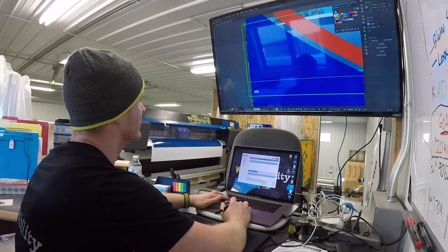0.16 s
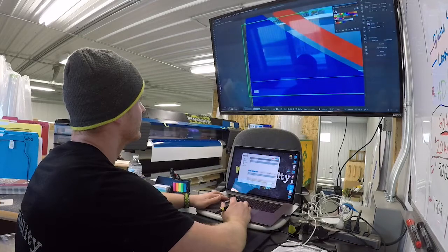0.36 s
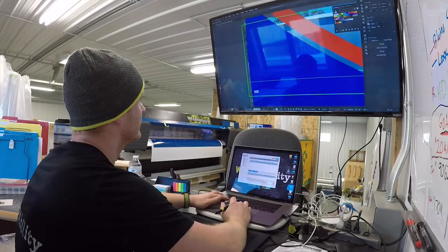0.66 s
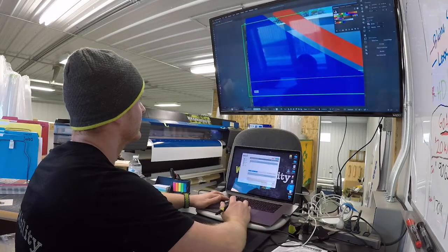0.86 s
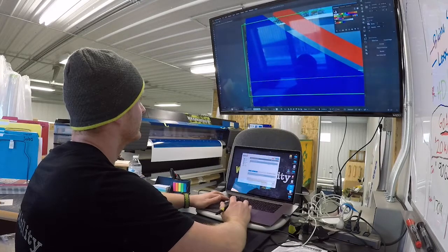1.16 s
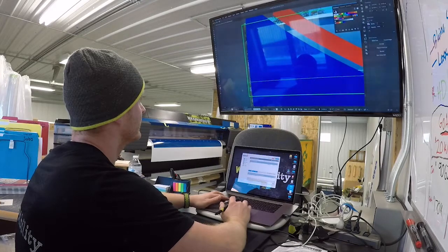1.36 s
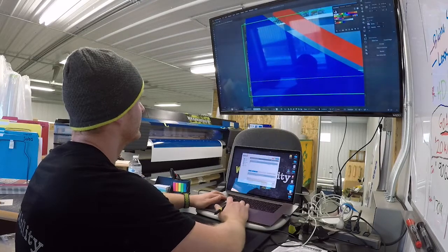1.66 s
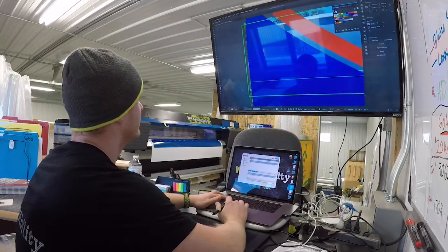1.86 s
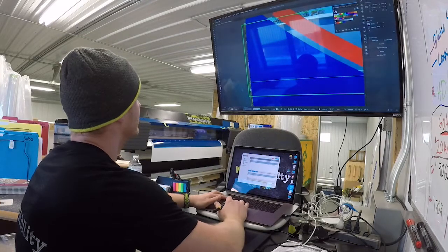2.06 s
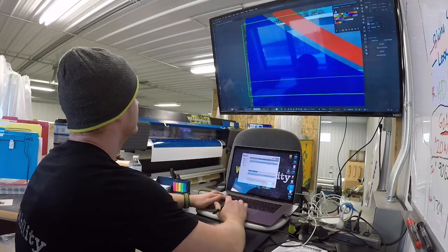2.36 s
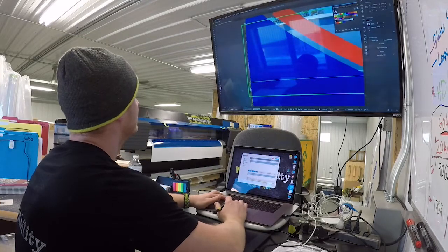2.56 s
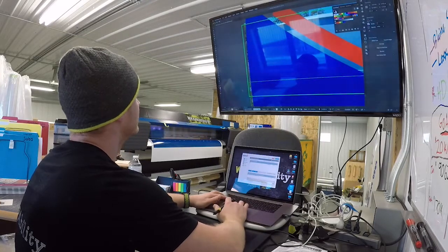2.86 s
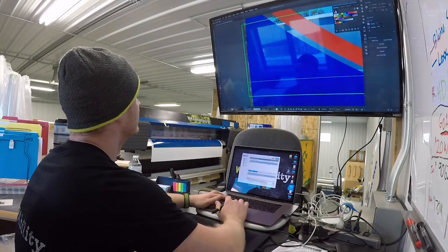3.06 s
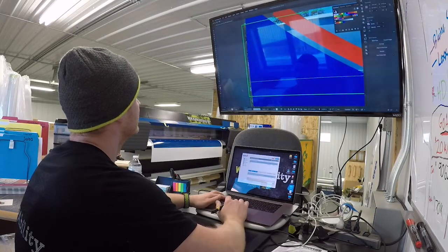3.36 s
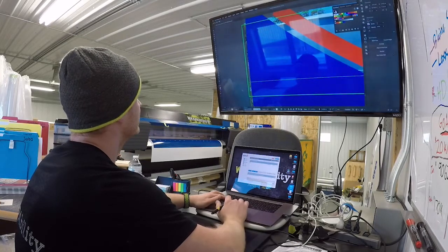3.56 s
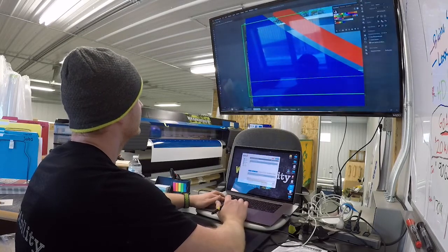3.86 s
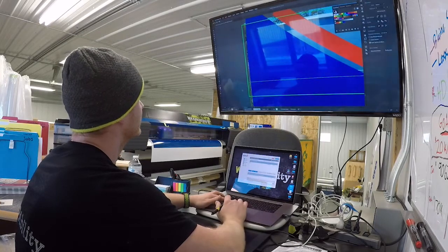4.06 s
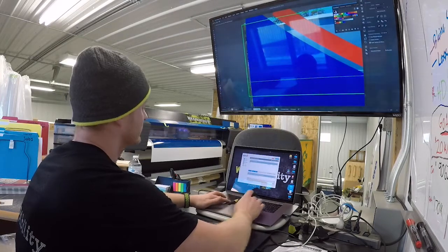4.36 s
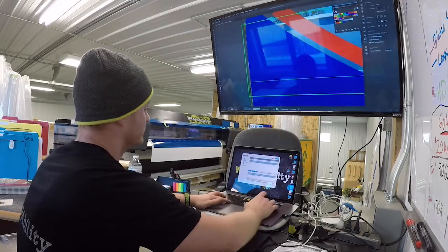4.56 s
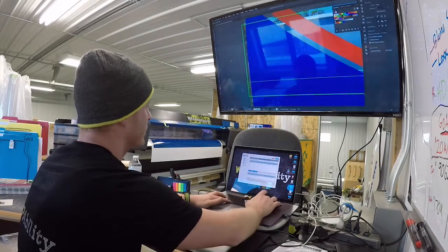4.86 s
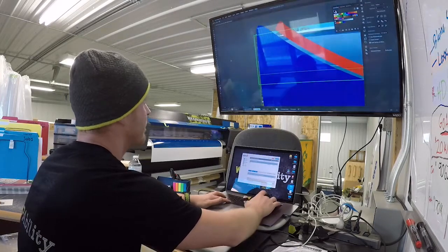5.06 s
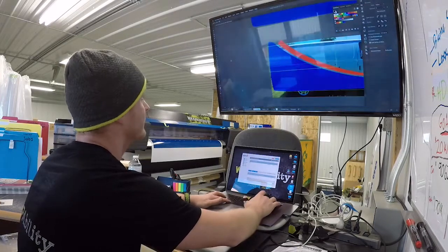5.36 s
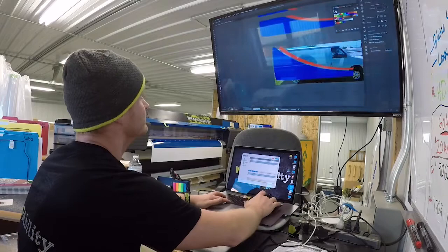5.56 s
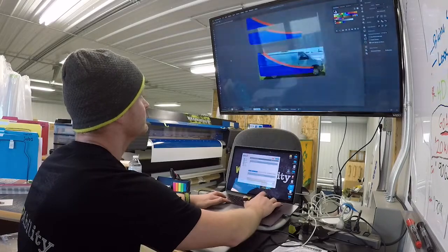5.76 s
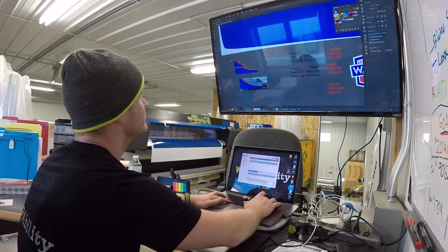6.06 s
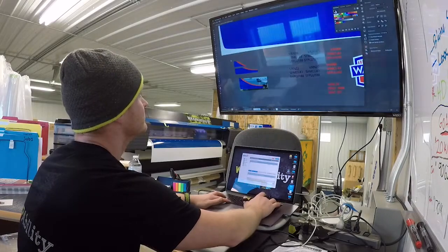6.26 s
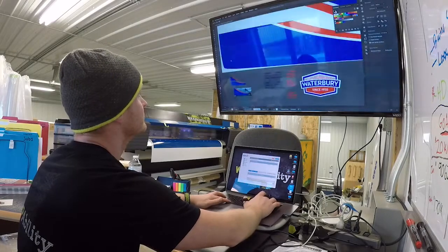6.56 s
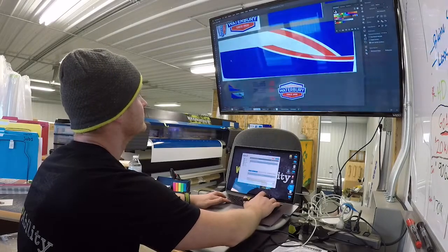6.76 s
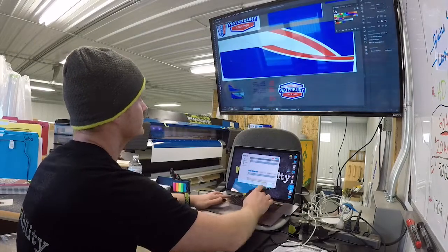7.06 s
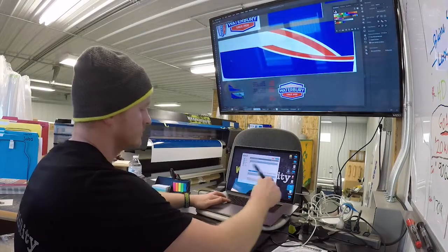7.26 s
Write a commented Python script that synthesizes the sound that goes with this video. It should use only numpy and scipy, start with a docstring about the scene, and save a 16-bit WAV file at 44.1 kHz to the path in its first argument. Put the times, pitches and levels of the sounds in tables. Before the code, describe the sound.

Indoors, a large inkjet printer's head whines along its rail, brakes, rests and returns, above a constant throbbing vacuum-fan drone.

```python
"""The carriage of a wide-format inkjet printer sweeps along its rail, brakes, rests and sets off back.
Its drive gear whines with its speed, made of gliding tones and noise; belt and motor add tones.
Sliding parts hiss and rumble as filtered noise, and the workshop adds a tail of echoes.
Behind it, vacuum fans hum with wavering tones and blow with shaped noise without pause.
A few small ticks, short bursts of noise, sound nearby."""
import sys
import numpy as np
from scipy import signal
from scipy.fft import next_fast_len
from scipy.io import wavfile

SR = 44100
rng = np.random.default_rng(int(sys.argv[2]) if len(sys.argv) > 2 else 0)


def waveform_to_disk(signal):
    """Save audio, clipped to [-1, 1], as 16-bit WAV at the path in sys.argv[1]."""
    frames = np.transpose(np.atleast_2d(signal))
    scaled = np.clip(frames, -1, 1) * 32767
    samples = np.round(scaled).astype(np.int16)
    wavfile.write(sys.argv[1], SR, samples)


N = 327247
TIME = np.arange(N) / SR
SIDES = np.array([[1], [-1]])  # left, right


def undb(db):
    """Turn decibels into a gain: every 20 dB is a factor of ten."""
    return 10 ** (np.asarray(db) / 20)


def read(points, hz):
    """Join (frequency, value) points by straight lines on a log-frequency axis."""
    at, value = np.transpose(points)
    return np.interp(np.log(hz + 1), np.log(at), value)


def walk(rate):
    """Wander smoothly between random values of spread 1, drawn rate times a second."""
    knots = rng.standard_normal(1024)
    coarse = TIME[::64]
    k = (coarse * rate).astype(int)
    blend = np.sin((coarse * rate - k) * np.pi / 2) ** 2
    here, following = knots[k % len(knots)], knots[(k + 1) % len(knots)]
    return np.interp(TIME, coarse, here * (1 - blend) + following * blend)


# how alike diffuse sound is on the left and right: (frequency [Hz], likeness [-1 to 1])
LIKENESS = [(60, 0.5), (150, 0.9), (290, 0.8), (630, 0.37), (1200, 0), (2000, 0.16), (4000, 0.97),
            (6500, 0.18), (8500, -.2), (12500, 0.05)]
# the printer's bass comes from the left: (frequency [Hz], left minus right [dB])
BALANCE = [(60, 11), (180, 3.5), (370, 3), (680, 0), (1260, -0.5), (2300, -0.5), (4200, 1.5), (8000, 0.5)]


def noise(spectrum):
    """Complex stereo noise; its real part has the spectrum given as (frequency [Hz], level [dB per Hz])."""
    size = next_fast_len(N)
    hz = np.arange(size // 2) * SR / size
    mid, side = rng.standard_normal((2, len(hz))) + 1j * rng.standard_normal((2, len(hz)))
    like = np.clip(read(LIKENESS, hz), -1, 1)
    # the shared part makes the two sides alike, the opposed part makes them differ
    ears = mid * np.sqrt((1 + like) / 2) + SIDES * side * np.sqrt((1 - like) / 2)
    gain = undb(read(spectrum, hz) + SIDES * read(BALANCE, hz) / 2)
    return np.fft.ifft(ears * gain, size)[:, :N] * np.sqrt(size * SR)


# as the carriage crosses the room's standing waves, its tones shift between left and right
SWAY_RAD, SWAY_DB, SWAY_RATE = .75, 2.5, 3  # spread [rad], spread [dB], shifts a second


def tones(table, clock, flutter_db, flutter_rate, drift_rad, moving=False):
    """Fluttering, drifting tones of turning parts; clock counts seconds of full-speed running."""
    out = np.zeros((2, N))
    for hz, db, pan_db, lead in table:
        phase = 2 * np.pi * (hz * clock + rng.random()) + drift_rad * walk(2.5)
        size = np.sqrt(2) * undb(db + flutter_db * walk(flutter_rate))
        left, right = undb(pan_db / 2), undb(-pan_db / 2)
        if moving:
            sway = undb(SWAY_DB / 2 * walk(SWAY_RATE))
            left, right = left * sway, right / sway
            lead = lead + SWAY_RAD * walk(SWAY_RATE)
        out[0] += size * left * np.sin(phase + lead / 2)
        out[1] += size * right * np.sin(phase - lead / 2)
    return out


def room(x, wet_db, t60):
    """The workshop's many echoes form a tail, different left and right, that falls 60 dB in t60 seconds."""
    t = TIME[:SR]
    tail = rng.standard_normal((2, SR)) * np.exp(-np.log(1000) * t / t60) * (t > .006)
    tail /= np.sqrt(np.sum(tail ** 2, axis=1, keepdims=True))
    wet = undb(wet_db) * signal.fftconvolve(x, tail, axes=1)[:, :N]
    return (x + wet) / np.hypot(1, undb(wet_db))


def linger(level, t60):
    """The room's standing waves build a tone's level up gradually and let it die gradually."""
    keep = np.exp(-np.log(1000) / (t60 * SR))
    return signal.lfilter([1 - keep], [1, -keep], level)


CYCLE_S = 4.195  # once out and back
# outward, then return stroke: (full speed first reached [s], length of run-up [s], time at full speed [s])
STROKES = [(-0.485, .22, 1.587), (1.66, .3, 1.548)]


def sweeps():
    """List every pass: (stroke, full speed reached [s], length of run-up [s], time at full speed [s])."""
    passes = []
    for stroke, (first, run_up, length) in enumerate(STROKES):
        for cruise in np.arange(first, TIME[-1], CYCLE_S):
            passes.append((stroke, cruise, run_up, length))
    return passes


def along_rail(curves):
    """Level in dB along each sweep, from one outward and one return curve timed from reaching full speed."""
    points = sorted((cruise + after, db) for stroke, cruise, _, _ in sweeps() for after, db in curves[stroke])
    return np.interp(TIME, *np.transpose(points))


def by_direction(table):
    """Choose each tone's level by which way the carriage is pulled."""
    first, run_up, _ = STROKES[0]
    outward = (TIME - first + run_up) % CYCLE_S < CYCLE_S / 2
    return [(hz, np.where(outward, out_db, back_db), pan_db, lead)
            for hz, out_db, back_db, pan_db, lead in table]


# blade tones: (frequency [Hz], level before a small raise [dB], left minus right [dB], left lead [rad])
FAN_TONES = [(668.3, -46.1, 10, -.1), (1003.6, -58, -5, -2.5), (1061, -63, -5, 1.4),
             (1124.3, -52, -1, -1.2), (1179, -59.2, 2, -1.1), (2006, -69, 0, -.5)]
# a second, slightly faster fan: (frequency [Hz], relative level [dB], left minus right [dB], left lead [rad])
LOOSE_FAN = [(679.3, -50.5, -2, -.8), (764, -64.5, 0, -.4)]
# the passing carriage shades the second fan; outward, then return:
# (time after reaching full speed [s], level change [dB])
LOOSE_FAN_DB = [
    [(0, 2), (.5, -11), (.9, .5), (1.25, -.5), (1.55, 5)],
    [(-.1, .5), (.45, .5), (.95, -12), (1.2, 1.5), (1.55, 4)],
]
# shaft tones throbbing in the bass: (frequency [Hz], level [dB], left minus right [dB], left lead [rad])
DRONE = [(167.3, -51, 5, -.4), (171, -47.3, 5, -.4), (336, -58, 6, -.5)]
# air rushing through the fans and the platen: (frequency [Hz], level before a small raise [dB per Hz])
FAN_AIR = [(30, -97), (105, -98), (140, -72.5), (170, -62.5), (200, -66.5), (280, -68.5), (380, -72.5),
           (540, -72.5), (570, -80), (600, -68.5), (630, -74), (780, -79.5), (1150, -81.5), (1350, -83.5),
           (1600, -84), (2400, -85.5), (2700, -89), (2980, -94), (3350, -87.5), (4300, -97), (6200, -86.5),
           (8200, -100), (10000, -102), (11300, -112), (12300, -110), (14000, -116)]


def fans():
    """Spinning blades give close tones that beat, over a throbbing shaft drone and rushing air."""
    hum = undb(1.0) * tones(FAN_TONES, TIME, flutter_db=1.0, flutter_rate=5, drift_rad=.6)
    second = tones(LOOSE_FAN, TIME, flutter_db=.8, flutter_rate=3, drift_rad=.6)
    second = undb(along_rail(LOOSE_FAN_DB)) * second
    drone = tones(DRONE, TIME, flutter_db=3.8, flutter_rate=11, drift_rad=1.5)
    air = noise(FAN_AIR).real * undb(0.17 * walk(7.8) + 2.5)
    return hum + second + drone + air


# small ticks: (time [s], level before halving and filtering [dB])
TICKS = [(4.3622, -22), (5.4505, -34), (5.6197, -38)]


def ticks(decay_s, low_hz):
    """Light, dry plastic ticks: bright bursts of noise that die within milliseconds."""
    out = np.zeros((2, N))
    t = TIME[:SR // 20]
    for s, db in TICKS:
        start = int(s * SR)
        burst = rng.standard_normal((2, len(t))) * np.exp(-t / decay_s)
        out[:, start:start + len(t)] += undb(db) * burst / 2
    band = signal.butter(2, [low_hz, 8500], "bandpass", fs=SR, output="sos")
    return signal.sosfilt(band, out)


BRAKE_S = .112  # from full speed to rest


def carriage_speed():
    """Share of full speed: the servo eases into each sweep and brakes hard at its end."""
    speed = np.zeros(N)
    for _, cruise, run_up, length in sweeps():
        short = np.maximum((cruise - TIME) / run_up, (TIME - cruise - length) / BRAKE_S)
        speed += 1 - np.clip(short, 0, 1) ** 2
    return speed


RUMBLE_TOP_HZ = 402
# belt and bearings ringing the housing panels: (frequency [Hz], relative level [dB per Hz])
RAIL = [(110, -99), (145, -69), (175, -59), (215, -61), (300, -79), (580, -76), (800, -82.5), (1450, -82),
        (2450, -83.5), (2620, -78.5), (2850, -82), (3200, -79), (3380, -84), (3600, -79), (3900, -83.5),
        (4060, -81.5), (4250, -85), (4600, -79.5), (4950, -83.5), (5400, -82), (5700, -78), (6100, -77.5),
        (7600, -82.5), (9000, -93), (10300, -101), (11300, -108), (12300, -106), (14500, -116)]
# hiss, outward then return: (time after reaching full speed [s], relative level [dB])
HISS_DB = [
    [(-.1, -3), (.2, -0.5), (1, 1), (1.6, 0.5)],
    [(0, 0.69), (.9, 0.045), (1.55, -1.8)],
]
# rumble, outward then return: (time after reaching full speed [s], relative level [dB])
RUMBLE_DB = [
    [(0, -12), (.2, -6), (.4, 2.5), (1.6, 1.5)],
    [(0, 3), (.25, -3), (1.55, -1)],
]


def rolling(speed):
    """Sliding parts hiss into the room and the frame rumbles from the first movement."""
    rush = noise(RAIL).real
    rumble = signal.sosfiltfilt(signal.butter(2, RUMBLE_TOP_HZ, fs=SR, output="sos"), rush)
    flicker_db = .6 * walk(25)
    hiss = (rush - rumble) * undb(along_rail(HISS_DB) + flicker_db - 0.14) * speed ** 2.0
    return room(hiss, wet_db=-5.5, t60=0.38) + rumble * undb(along_rail(RUMBLE_DB) - 1.7) * speed ** 1.5


# hum of the carriage motor: (frequency at full speed [Hz], relative level [dB],
# left minus right [dB], left lead [rad])
MOTOR = [(646, -45.2, 4, -.6)]
# motor, outward then return: (time after reaching full speed [s], level change [dB])
MOTOR_DB = [
    [(0, 1.5), (.25, 2.5), (.6, 1.5), (.9, -7.5), (1.25, -2), (1.6, -15.5)],
    [(0, -1), (.35, -2), (.7, -1), (1.35, 3.5), (1.55, -8)],
]
# belt and pulley tones: (frequency [Hz], level going out [dB], level coming back [dB],
# left minus right [dB], left lead [rad])
DRIVE = [(204, -51, -58, 3, -.3), (402.3, -56.5, -55, 1, -.6), (453, -60, -63, 2, -.4),
         (501, -56.5, -57.5, 2, -.3), (702, -63, -67, 2, -.4), (1342.2, -56.3, -58.3, -5, -1),
         (4592, -70, -70, 1, -.2)]


def motor_and_belt(speed, clock):
    """Motor hum follows the speed and belt tones hold their pitch; both build up and linger in the room."""
    motor_level = linger(undb(along_rail(MOTOR_DB)) * speed ** 8, t60=.45)
    motor = motor_level * tones(MOTOR, clock, flutter_db=.5, flutter_rate=5, drift_rad=.25)
    belt = tones(by_direction(DRIVE), TIME, flutter_db=2.5, flutter_rate=5, drift_rad=.38)
    return motor + linger(speed ** 16, t60=.3) * belt


def gliding(spectrum, clock):
    """Noise around the gear's main tone, shifted so that it rises and falls with that tone."""
    return np.real(noise(spectrum) * np.exp(2j * np.pi * GEAR[0][0] * (clock - TIME)))


STRAIN_DB = -3.5  # gliding gear tones against the steady ones, before the torque and speed act
# teeth rattling under torque: (frequency at full speed [Hz], relative level [dB per Hz])
RATTLE = [(1500, -100), (1750, -72), (1900, -66), (2060, -62.5), (2190, -69), (2350, -98)]
# strained gear, outward then return: (time after reaching full speed [s], level change [dB])
RATTLE_DB = [
    [(-.095, -24), (-.068, 2), (-.04, -.5), (0, 3), (1.57, -4), (1.61, 3.5), (1.63, -1), (1.655, -13)],
    [(-.165, -14), (-.128, 2), (-.09, -1.5), (-.04, 1), (1.53, -3), (1.565, 0), (1.6, -13)],
]
# resonances of the housing: (frequency [Hz], width [Hz], level [dB])
HOUSING = [(1580, 130, -2), (1786, 160, 2), (1873, 94, 6), (2100, 98, 4)]


def gear_rattle(speed, clock):
    """While speeding up or braking the gear tone glides and rattles through the housing's resonances."""
    torque = np.tanh(np.abs(np.gradient(speed)) * SR / 1.2)
    glide = undb(STRAIN_DB) * tones(GEAR, clock, flutter_db=1.5, flutter_rate=40, drift_rad=.3)
    teeth = (glide + gliding(RATTLE, clock)) * undb(along_rail(RATTLE_DB)) * torque * speed ** 2
    rung = np.zeros((2, N))
    for k, (hz, width, db) in enumerate(HOUSING):
        resonance = signal.lfilter(*signal.iirpeak(hz, hz / width, fs=SR), teeth)
        rung += (-1) ** k * undb(db) * resonance  # neighbours have opposite sign
    return room(rung, wet_db=-6, t60=.55)


def afterglow(level, speed, t60):
    """The room holds a thin trace of the full-speed gear tone after the gear has left that pitch."""
    on_pitch = speed ** 40
    held = undb(-11.5) * linger(level * on_pitch, t60)
    trace = tones(GEAR[:1], TIME, flutter_db=2.5, flutter_rate=22, drift_rad=.6, moving=True)
    return held * (1 - on_pitch) * trace


# main tone of the meshing gear teeth, then its strongest sideband:
# (frequency at full speed [Hz], relative level [dB], left minus right [dB], left lead [rad])
GEAR = [(2013.3, -41, 0, -0.2), (2056.4, -44.8, -2, -0.6)]
# main tone along the rail, outward then return: (time after reaching full speed [s], level change [dB])
MESH_DB = [
    [(-.085, -22), (-.06, -2), (.1, -1), (.4, 1.5), (.7, -.5), (.82, 1.5), (.92, -7), (1.05, 4.5),
     (1.16, -1), (1.27, 2), (1.33, 1), (1.42, 4), (1.61, 3.5), (1.63, -10)],
    [(-.15, -3), (-.115, 1), (-.075, -7), (0, -6), (.57, -7), (.7, -1), (.9, -.5), (1.25, -3), (1.35, -7),
     (1.575, -3), (1.6, -12)],
]
# strongest sideband, outward then return: (time after reaching full speed [s], level change [dB])
SIDEBAND_DB = [
    [(-.085, -22), (-.05, -4), (.1, 2), (.4, -.5), (1.1, 0), (1.45, -4.5), (1.62, -5)],
    [(-.12, -6), (0, -1), (.3, -2), (.47, 6), (.62, -3), (.8, -4), (1.2, 0), (1.43, 2), (1.58, 0)],
]
# weaker sidebands, whole shaft turns apart: (frequency at full speed [Hz], relative level going out [dB],
# relative level coming back [dB], left minus right [dB], left lead [rad])
SIDEBANDS = [(1733.5, -63.5, -63.5, -2, -.2), (1776, -62, -68, 0, -.4), (1789.4, -68, -61, 0, -.8),
             (1927.3, -67, -57, -3, -.8), (1957.3, -64, -58, -1, 0), (1970.3, -51.5, -50.5, -3, .8),
             (1981, -57, -58, 2, -.5), (1991.8, -50, -54, 1, -.6), (2002.6, -53, -53, -2, -.7),
             (2024, -52, -60, 0, -.5), (2035, -59, -56, 0, -.4), (2069.2, -54, -47.5, 0, -.7),
             (2099.4, -61, -62, 0, 0)]
# skirt of noise from uneven tooth contact: (frequency at full speed [Hz], relative level [dB per Hz])
CHATTER = [(1550, -102), (1720, -77), (1900, -68.5), (1975, -66.5), (2015, -63), (2075, -65), (2130, -71),
           (2230, -90), (2500, -105)]
# skirt and weaker sidebands, outward then return: (time after reaching full speed [s], level change [dB])
CHATTER_DB = [
    [(0, 0), (.5, -1), (1.4, -0.92), (1.6, -0.8)],
    [(0, 0), (1.55, 0)],
]


def drive_whine(speed, clock):
    """At even speed meshing teeth make a firm tone; sidebands beat against it into a fine waver."""
    settled = speed ** 20  # nearly silent unless close to full speed
    mesh_level, uneven = undb(along_rail(MESH_DB)), undb(along_rail(CHATTER_DB))
    mesh = mesh_level * tones(GEAR[:1], clock, flutter_db=1.1, flutter_rate=10, drift_rad=.4, moving=True)
    upper = tones(GEAR[1:], clock, flutter_db=.8, flutter_rate=6, drift_rad=.25, moving=True)
    upper = undb(along_rail(SIDEBAND_DB)) * upper
    weak = uneven * tones(by_direction(SIDEBANDS), clock, flutter_db=1.6, flutter_rate=4, drift_rad=.35)
    chatter = uneven * gliding(CHATTER, clock)
    whine = room((mesh + upper + weak) * settled, wet_db=-17, t60=.8)
    return whine + afterglow(mesh_level, speed, t60=1.3) + room(chatter * settled, wet_db=-3, t60=.5)


def carriage():
    """One speed and the place on the rail drive the whine, hum and rolling noise."""
    speed = carriage_speed()
    clock = np.cumsum(speed) / SR  # seconds of full-speed running
    gear = drive_whine(speed, clock) + gear_rattle(speed, clock)
    return gear + motor_and_belt(speed, clock) + rolling(speed)


def scene():
    """Fans, ticks and carriage sound together."""
    return fans() + ticks(decay_s=.0016, low_hz=2500) + carriage()


TOP_HZ = 14600


def record(dry):
    """A steep low-pass filter removes the treble above TOP_HZ."""
    return signal.sosfilt(signal.ellip(10, .2, 80, TOP_HZ, fs=SR, output="sos"), dry)


dry = scene()
out = record(dry)
waveform_to_disk(out)
```